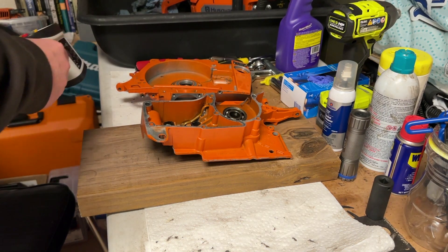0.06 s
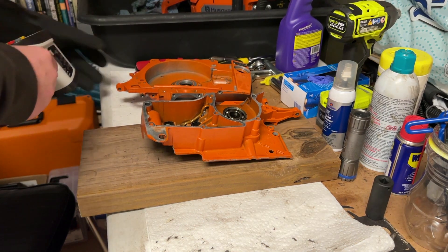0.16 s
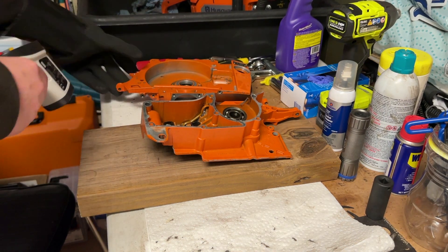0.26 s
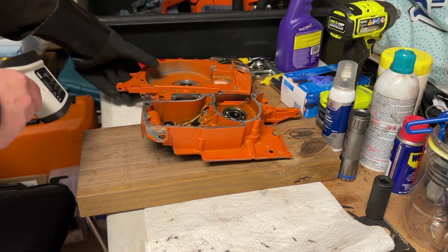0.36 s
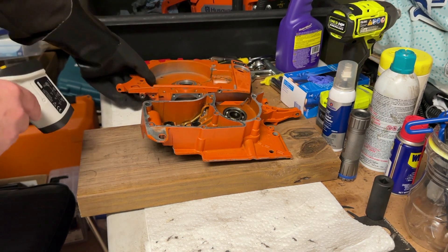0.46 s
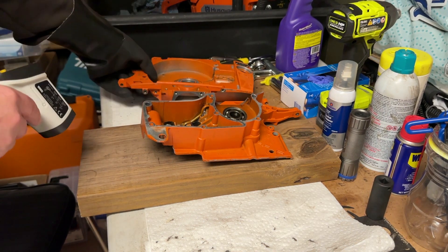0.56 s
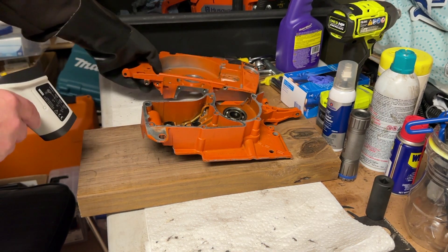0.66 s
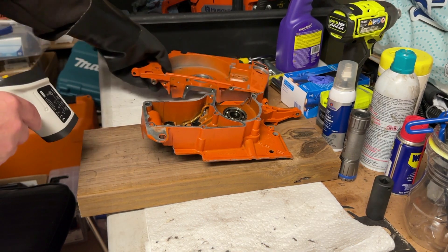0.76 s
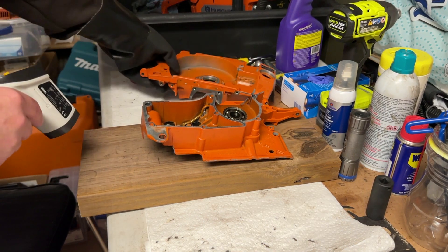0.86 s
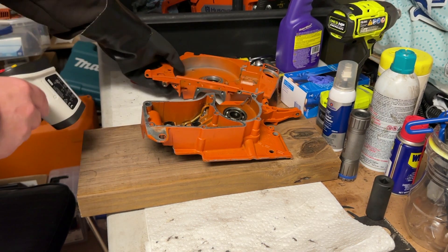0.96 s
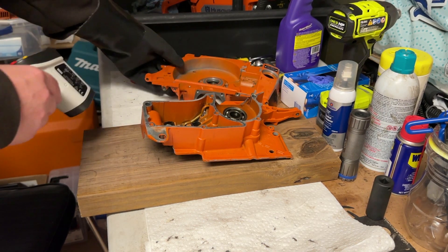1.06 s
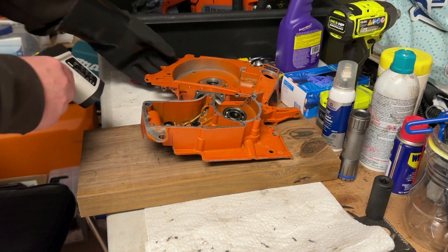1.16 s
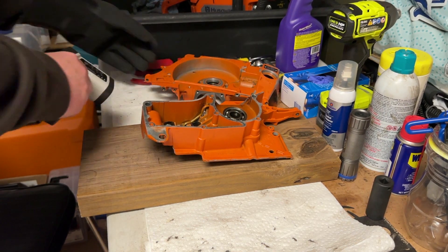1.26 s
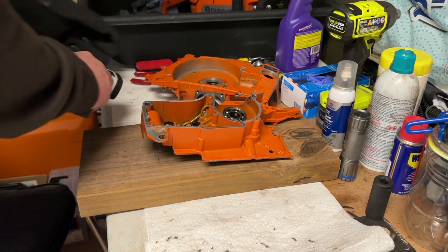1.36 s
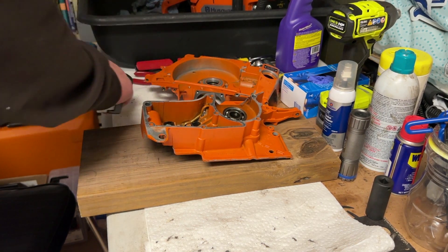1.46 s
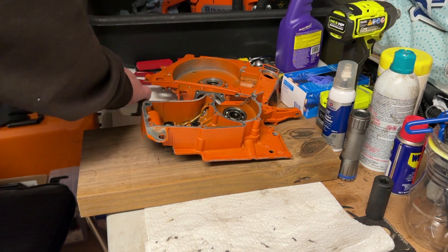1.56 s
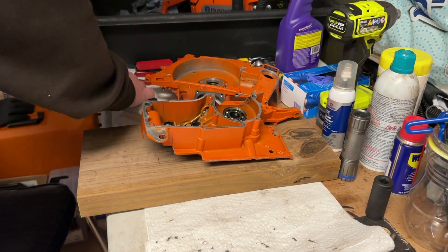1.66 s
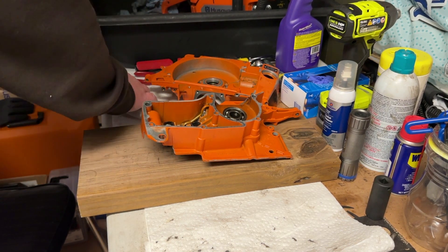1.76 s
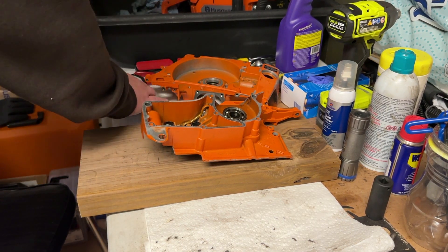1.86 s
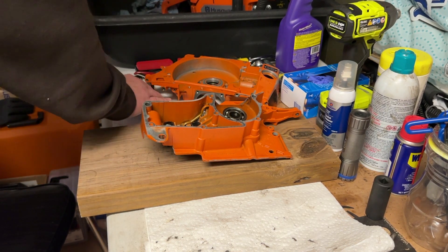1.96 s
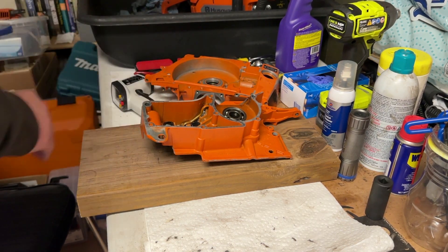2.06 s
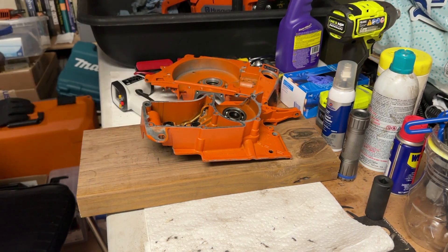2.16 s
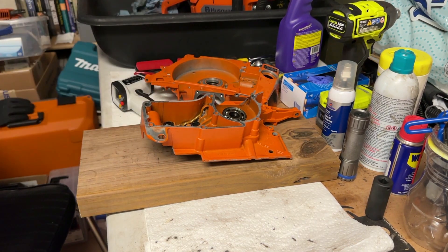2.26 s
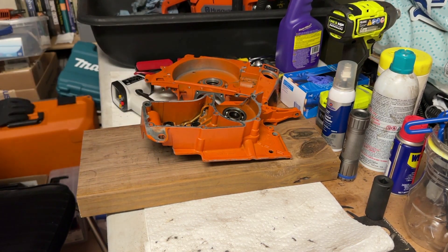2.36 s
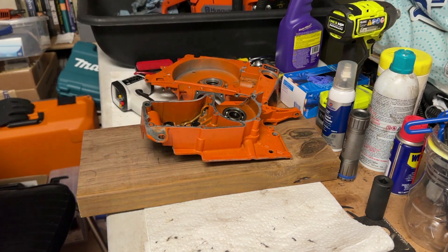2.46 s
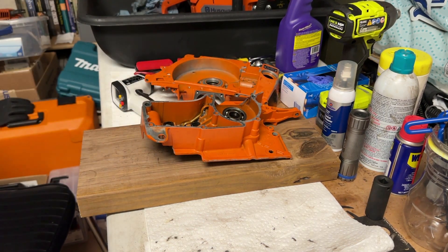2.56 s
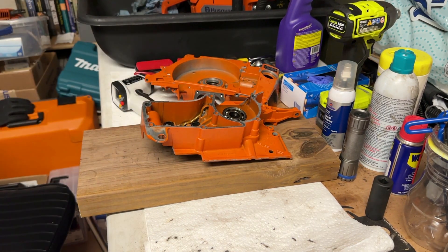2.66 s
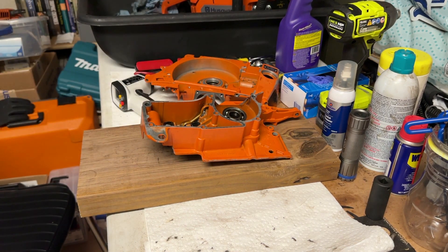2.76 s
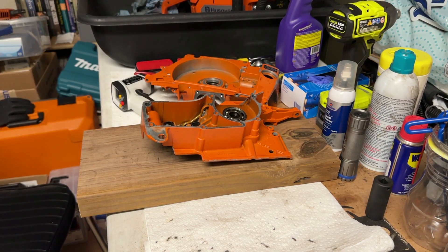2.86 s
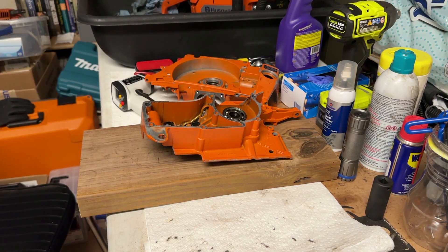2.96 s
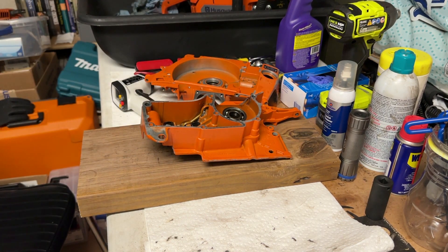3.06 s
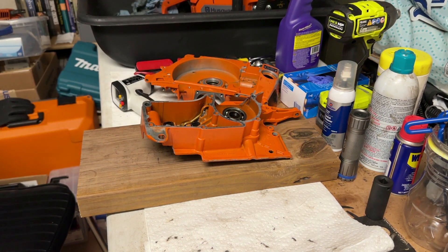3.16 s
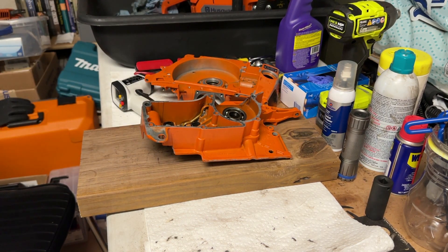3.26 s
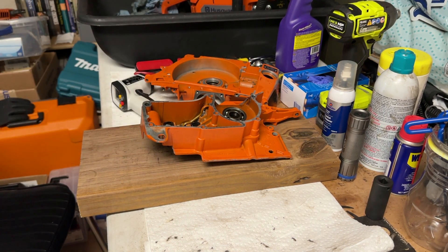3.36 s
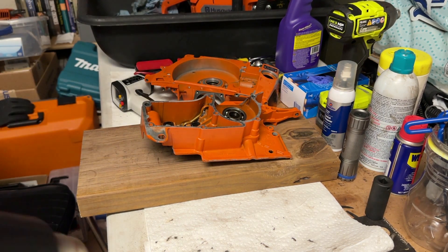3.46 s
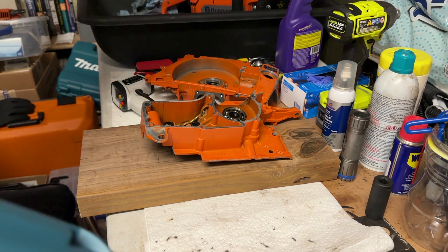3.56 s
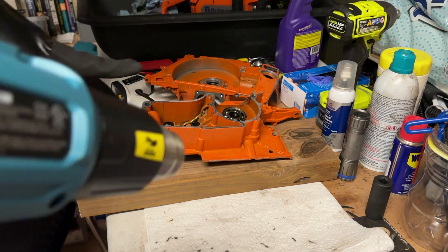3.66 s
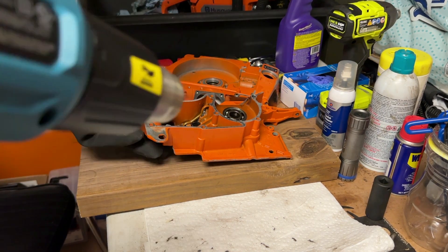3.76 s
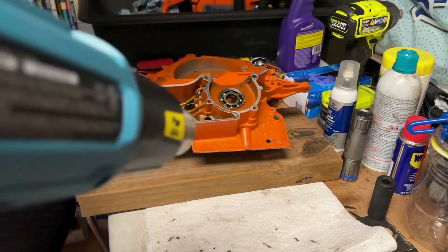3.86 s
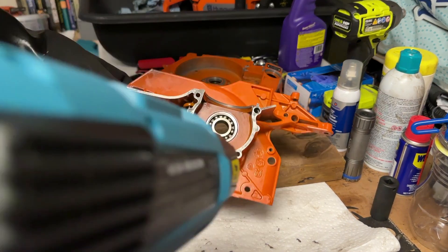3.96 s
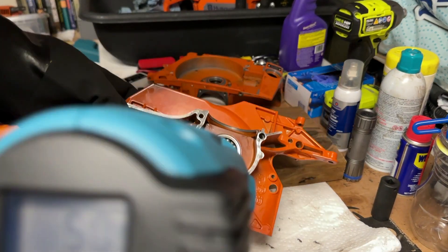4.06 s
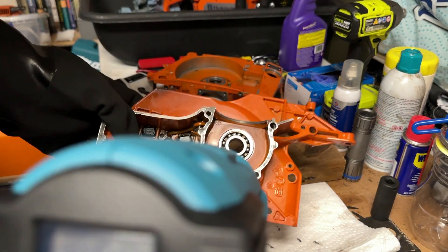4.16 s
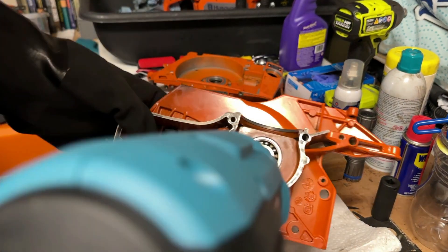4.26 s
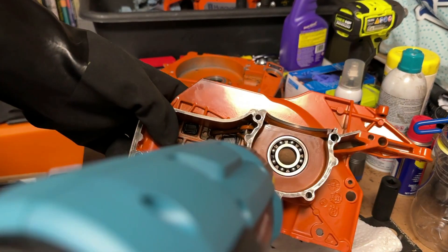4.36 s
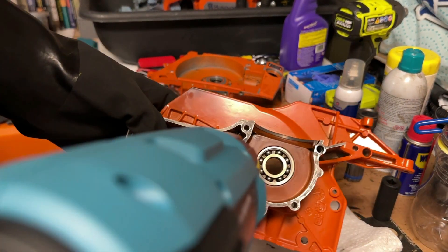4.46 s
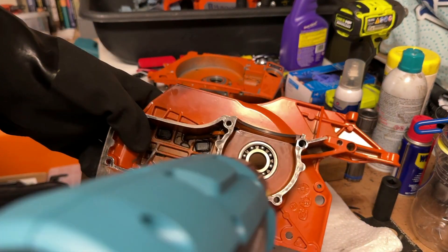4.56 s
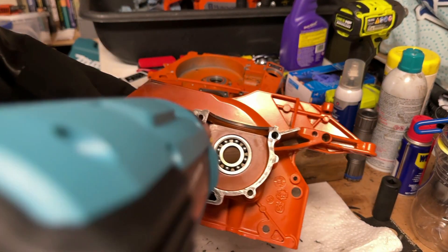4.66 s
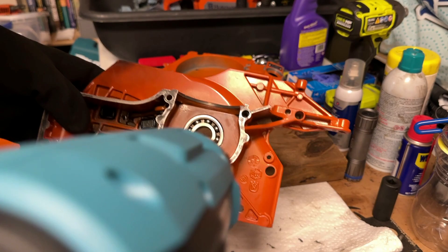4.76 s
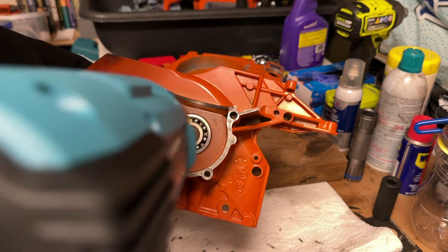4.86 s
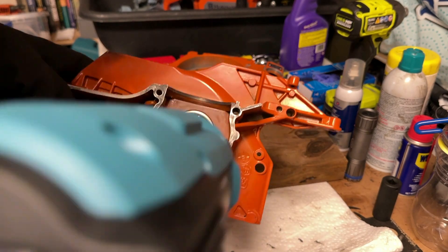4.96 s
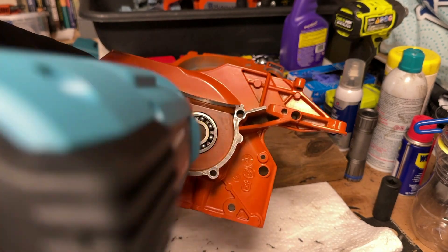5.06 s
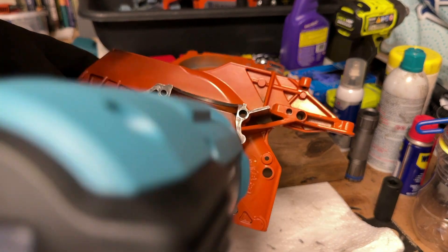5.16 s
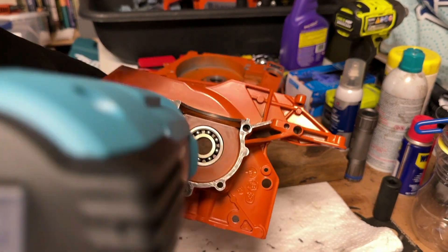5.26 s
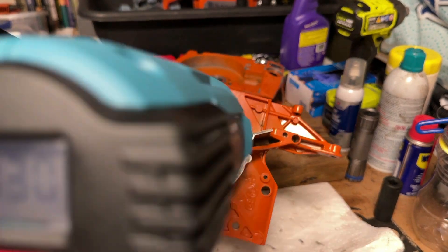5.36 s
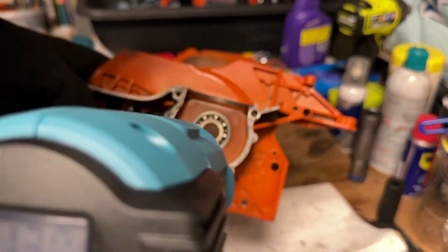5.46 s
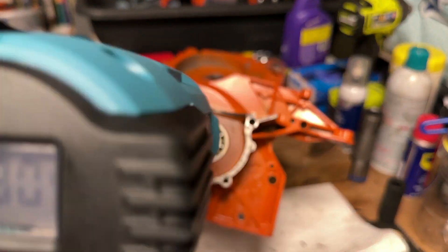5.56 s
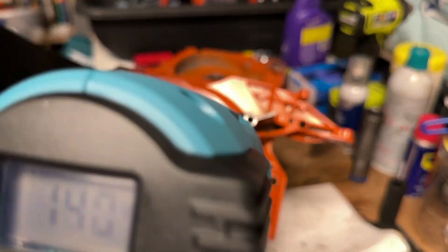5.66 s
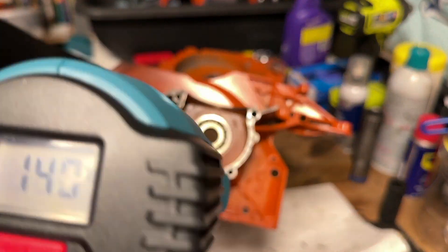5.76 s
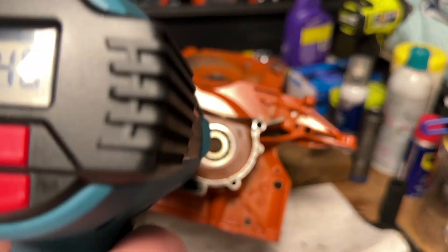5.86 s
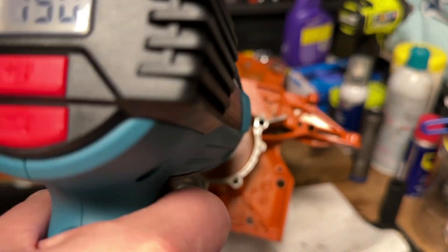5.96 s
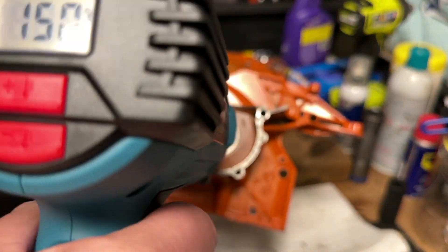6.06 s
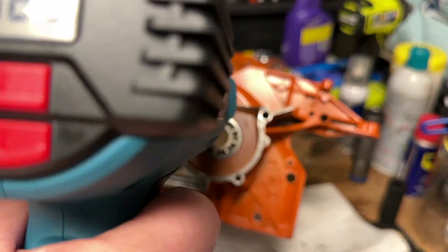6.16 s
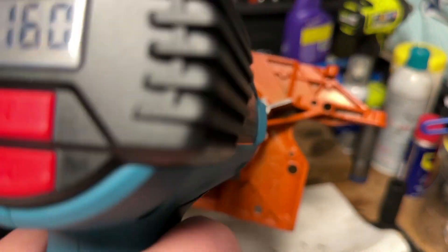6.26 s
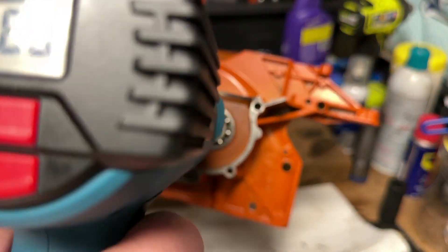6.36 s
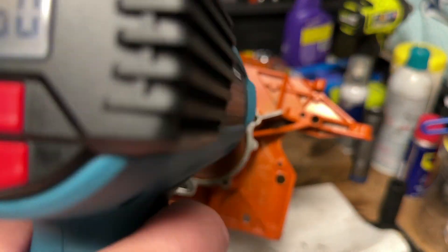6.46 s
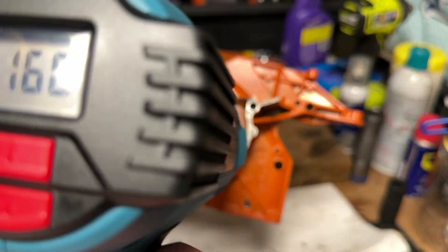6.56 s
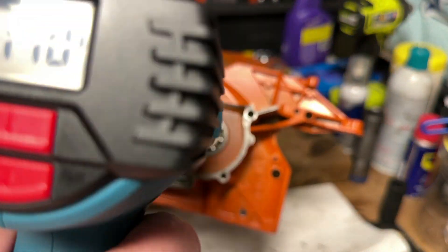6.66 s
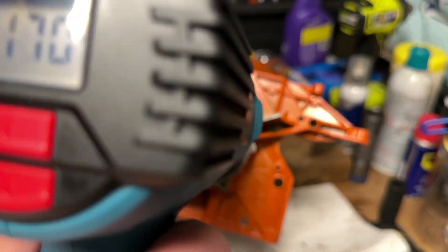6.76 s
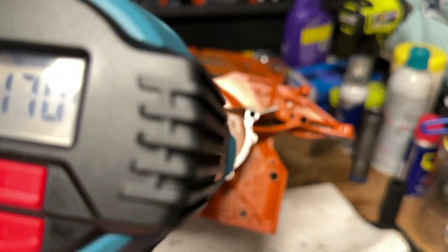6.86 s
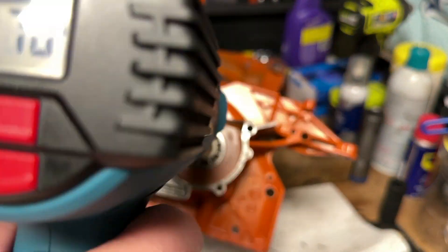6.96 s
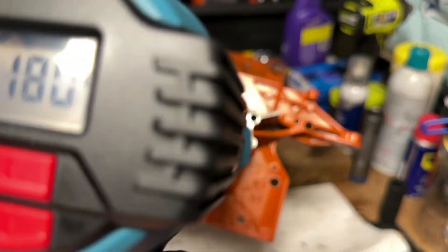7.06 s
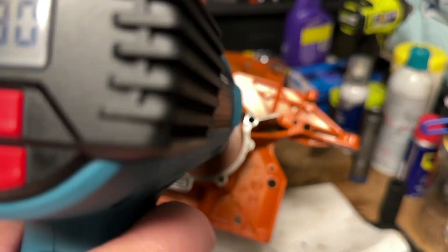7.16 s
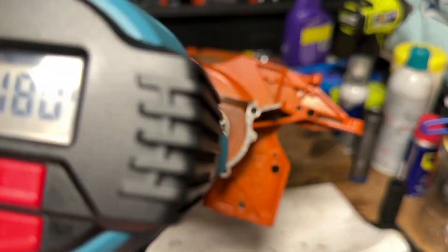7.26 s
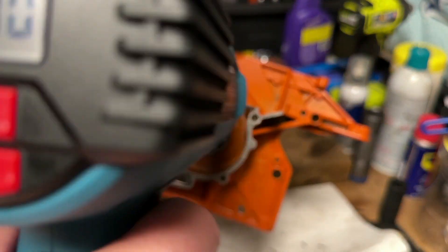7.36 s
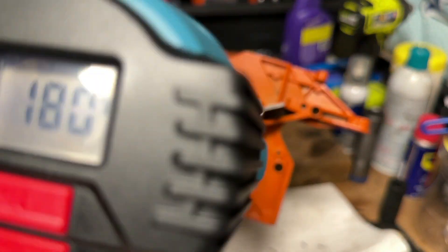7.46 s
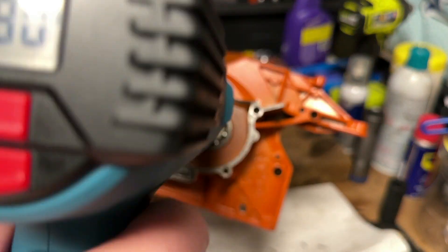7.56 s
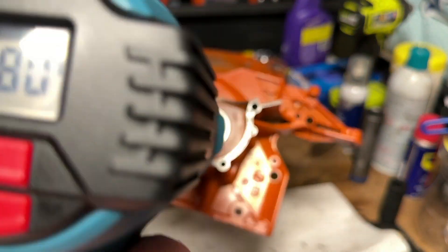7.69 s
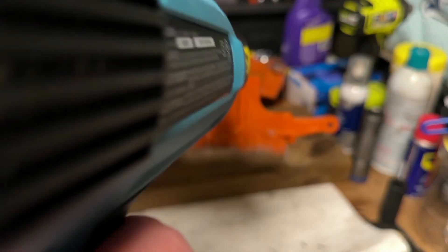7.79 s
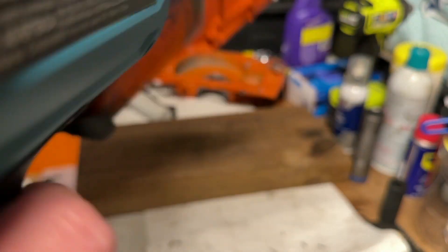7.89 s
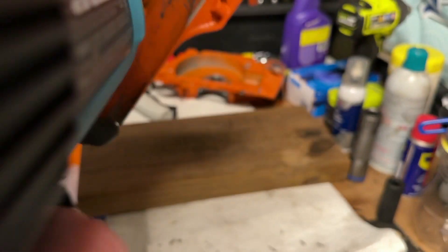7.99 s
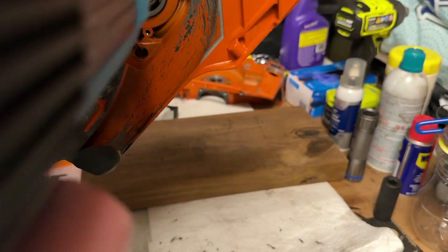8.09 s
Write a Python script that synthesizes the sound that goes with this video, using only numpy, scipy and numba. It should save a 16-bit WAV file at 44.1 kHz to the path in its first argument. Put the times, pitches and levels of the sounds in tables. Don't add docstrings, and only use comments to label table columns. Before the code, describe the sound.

Close stereo microphone in a quiet indoor workshop. First come short scrapes and woody thuds as a cast metal housing is shifted, peaking in a bright, short-ringing crack just before one second. Softer thumps and glove rustle lead to a heat gun starting at about three and a half seconds. Its motor glides up in pitch and settles to a constant fan roar and whine, with low air bumps, growing louder and shriller at the end.

```python
import sys
import numpy as np
from scipy import signal
from scipy.fft import rfft, irfft, next_fast_len
from scipy.io import wavfile
from scipy.ndimage import uniform_filter1d
from numba import njit

SR = 44100
rng = np.random.default_rng(int(sys.argv[2]) if len(sys.argv) > 2 else 0)


def gain_from_decibels(decibels):
    exponent = np.asarray(decibels, float) / 20
    return 10 ** exponent


def dump_mix(stems):
    frames = np.atleast_2d(stems).T
    limited = np.clip(frames, -1, 1)
    pcm = np.round(limited * 32767).astype(np.int16)
    wavfile.write(sys.argv[1], SR, pcm)


N = 358533


def seconds():
    return np.arange(N) / SR


def curves(table):
    s, *columns = np.transpose(table)
    return [np.interp(seconds(), s, c) for c in columns]


def along(points, hz):
    p = np.array(points, float)
    return np.interp(np.log(hz + 1), np.log(p[:, 0] + 1), p[:, 1])


def walk(rate):
    k = int(SR / rate)
    held = np.repeat(rng.standard_normal(N // k + 1), k)
    return 1.32 * uniform_filter1d(uniform_filter1d(held, k), k)[:N]


def hiss(colour, alike, balance, edges, lead=((1, 0), (2, 0))):
    size = next_fast_len(N)
    hz = np.arange(size // 2 + 1) * SR / size
    mid, side = rfft(rng.standard_normal((2, size)))
    likeness = np.clip(along(alike, hz), 0, 1)
    shared, differing = mid * np.sqrt(1 + likeness), side * np.sqrt(1 - likeness)
    leads = (hz < 10500) | (hz > 14100)
    lean = gain_from_decibels(along(balance, hz) / 2) * np.exp(.5j * along(lead, hz) * leads)
    pair = np.array([(shared + sign * differing) * lean ** sign for sign in (1, -1)])
    pair = pair * gain_from_decibels(along(colour, hz)) / (abs(lean) + 1 / abs(lean))
    below = [1 / (1 + (hz / e) ** 12) for e in edges]
    bands = [irfft(pair * np.sqrt(np.abs(hi - lo)), size)[:, :N] for lo, hi in zip(below, below[1:])]
    return [b / np.std(b.mean(axis=0)) for b in bands]


@njit
def svf(x, hz, width):
    y, b, l = np.empty(len(x)), 0., 0.
    for i in range(len(x)):
        g, k = np.tan(np.pi * hz[i] / SR), width / hz[i]
        v = (b + g * (x[i] - l)) / (1 + g * (g + k))
        b, l, y[i] = 2 * v - b, l + 2 * g * v, k * v
    return y


def resonance(x, centre, width):
    centre = np.zeros(N) + centre
    return svf(svf(x, centre, width), centre, width)


def bell(s, width):
    return gain_from_decibels(-5 * (2 * (seconds() - s) / width) ** 2)


# (frequency [Hz], level [dB per Hz])
FLOOR_COLOUR = [(18, -23.5), (30, 0.5), (124, 1), (735, -17.5), (816, -19.5), (1450, -19.5), (2210, -20.5),
                (7200, -29.5), (9860, -25.5), (15800, -29.5)]
# (frequency [Hz], likeness [0-1])
ROOM_LIKENESS = [(60, 0.93), (130, .92), (290, 0.5), (640, 0.5), (3100, 0.01), (10300, 0.3), (10700, 0.6),
                 (13300, 0.95), (14000, .3)]


def room_tone():
    tone, = hiss(FLOOR_COLOUR, ROOM_LIKENESS, [(30, .2), (15000, .3)], (15, 15900))
    return tone * gain_from_decibels(-72 + np.where(seconds() < 2.07, 0, -6) + 1.1 * walk(12))


# (start [s], length [s], scrape [dB], hiss [dB], bench rumble [dB])
DRAGS = [(0.425, 0.03, -62.5, -77, -65), (0.463, 0.052, -61, -71, -56), (0.515, 0.016, -49, -64, -38),
         (0.529, 0.093, -62, -66, -39), (0.82, 0.065, -49, -52.5, -29), (0.911, 0.042, -43, -57, -48),
         (.938, 0.026, -56, -44, -35), (0.974, 0.08, -54, -60, -48), (1.08, 0.075, -60, -69, -35.5),
         (1.177, 0.79, -82, -75.5, -73.5), (1.506, 0.14, -75, -69.5, -74), (1.85, 0.12, -78, -74, -66)]


def contacts():
    sag_db, release_db_per_s = -7.5, -330
    bite_s = np.array([[0.001], [.001], [0.012]])
    t, power = seconds(), 0
    for s, length, *db in DRAGS:
        shape_db = sag_db * np.clip((t - s) / length, 0, 1)
        shape_db = shape_db + release_db_per_s * np.clip(t - s - length, 0, 1)
        bite = np.clip((t - s + bite_s[0]) / bite_s, 0, 1)
        power = power + (bite * gain_from_decibels(shape_db + np.array(db)[:, None])) ** 2
    return np.sqrt(power)


# (frequency [Hz], level [dB per Hz])
GRAIN_COLOUR = [(300, 4.5), (600, 4), (1200, -1), (2200, -4), (3000, -12), (4500, -13), (6500, -11.5),
                (8000, -13.5), (9800, -7), (12000, -26.5), (15800, -17.5)]
# (time [s], width [s], dull
# part [dB], bright part [dB])
CLOTH = [(.15, 0.13, -73.5, -82), (.38, 0.15, -80.5, -80), (.595, 0.068, -60.5, -64),
         (1.89, 0.099, -80, -65.5), (1.955, 0.058, -69, -69), (2.154, 0.049, -71, -67),
         (2.246, 0.031, -70, -61.5), (2.278, 0.061, -68, -73), (2.335, 0.03, -74, -60.5),
         (2.376, 0.05, -64.5, -55.5), (2.449, 0.048, -70.5, -67), (2.526, 0.037, -69, -68.5),
         (2.584, 0.035, -68.5, -71), (2.65, .06, -82, -80), (2.711, 0.027, -70.5, -70),
         (2.818, 0.041, -64.5, -74.5), (2.875, 0.053, -67, -81.5), (2.905, 0.032, -66, -67),
         (3.088, 0.042, -65, -65), (3.15, 0.051, -68, -71.5), (3.19, 0.036, -70.5, -79),
         (3.245, 0.044, -75.5, -72), (3.28, 0.049, -64.5, -69.5), (3.379, 0.022, -69, -55),
         (3.404, 0.016, -56, -38)]
# (time [s],
# width [s], frequency [Hz], bandwidth [Hz], level [dB])
SINGING_RUBS = [(0.15, 0.3, 565, 80, -78), (0.55, .02, 7550, 120, -77), (0.586, 0.038, 840, 200, -60),
                (0.6, .07, 5100, 100, -72), (0.614, 0.027, 3530, 60, -68), (.832, 0.012, 3480, 200, -59),
                (.834, 0.013, 6500, 200, -57), (.845, .025, 480, 200, -52), (0.921, 0.015, 2100, 400, -47),
                (1.125, .08, 450, 200, -63), (1.13, 0.05, 4570, 40, -78), (1.867, .02, 2000, 400, -66),
                (1.94, 0.084, 2000, 540, -72), (2.712, .03, 6800, 300, -73), (2.716, .025, 1900, 980, -70),
                (2.9, 0.037, 1170, 900, -65.5), (3.09, 0.034, 1550, 970, -62.5),
                (3.28, 0.039, 1400, 700, -57), (3.4, 0.027, 8900, 900, -53), (3.405, 0.03, 2530, 2800, -46),
                (3.45, 0.12, 620, 60, -67), (3.5, .04, 1400, 600, -60), (3.53, .04, 12500, 2500, -64),
                (3.66, 0.093, 680, 90, -55)]


def handling():
    dull, bright = hiss(GRAIN_COLOUR, ROOM_LIKENESS, [(300, 2.5), (4000, 3.3), (10000, .1)],
                        (300, 3000, 15900))
    rumble, = hiss([(40, -4.0), (90, 2.0), (160, -4.5), (300, -9)], [(40, 0.97), (300, 0.98)],
                   [(40, .8), (300, 1.2)], (40, 300))
    *gains, bench = contacts()
    for s, width, *db in CLOTH:
        gains = [np.hypot(g, bell(s, width) * gain_from_decibels(d)) for g, d in zip(gains, db)]
    low = gain_from_decibels(-9.5) * bench + 0.54 * gains[0] + gain_from_decibels(-83.0) * (seconds() < 2.75)
    out = dull * gains[0] * gain_from_decibels(2.1 * walk(150))
    out += bright * gains[1] * gain_from_decibels(2.9 * walk(200)) + rumble * low
    for s, width, hz, width_hz, db in SINGING_RUBS:
        x = np.array([resonance(v, hz, 2.5 * width_hz) for v in dull + bright])
        out += x / np.std(x.mean(axis=0)) * bell(s, width) * gain_from_decibels(db)
    return out


# (time [s], peak [dB], frequency [Hz], t60 [s])
BENCH_THUDS = [(.4245, -56, 640, .03), (1.603, -64, 520, .04), (1.725, -61, 806, .06),
               (.5135, -40, 650, .015), (1.934, -56, 700, .03), (1.998, -51, 150, .05),
               (2.025, -56.5, 125, 0.042), (.516, -34, 313, 0.019), (0.526, -35, 90, 0.16),
               (0.827, -30, 214, 0.064), (.845, -32.5, 84, 0.1), (0.935, -29.5, 338, 0.058),
               (1.098, -32, 94, 0.13), (1.599, -63.5, 120, 0.12), (1.851, -50, 113, 0.3),
               (1.87, -52, 70, .3), (1.942, -35.5, 142, 0.086), (2.268, -48.5, 196, 0.021),
               (2.389, -59.5, 132, 0.074), (2.579, -53, 141, 0.05), (3.948, -37, 70, 0.12),
               (4.21, -42, 126, .07), (6.135, -38.5, 35, .12), (6.25, -46, 40, .1), (6.4, -39, 33, 0.1),
               (6.542, -35.5, 39, 0.15), (6.69, -35, 38.3, 0.12), (6.82, -39, 44.7, 0.069),
               (6.965, -32, 45, 0.07), (7.69, -43, 55, .1), (7.841, -47, 45, 0.11)]


def thuds():
    out, t = np.zeros(N + SR), np.arange(SR // 2) / SR
    for s, peak_db, hz, t60 in BENCH_THUDS:
        swing = np.sin(2 * np.pi * hz * t) + 0.41 * np.sin(2 * np.pi * 1.55 * hz * t)
        swing = swing * 1000. ** (-t / t60) * (1 - np.exp(-(t * hz / .45) ** 2))
        out[int(s * SR):int(s * SR) + len(t)] += swing * gain_from_decibels(peak_db) / np.abs(swing).max()
    return out[:N] * gain_from_decibels([[.4], [-.4]])


# (time [s], peak [dB], ring time share [1], softness [ms])
BLOWS = [(.4252, -59, 0.15, 0.15), (.4632, -53, 0.15, .09), (.5135, -40.5, 0.1, 0.078),
         (0.8203, -45.5, 0.5, 0.092), (.9085, -35, 0.99, 0.06), (0.9331, -11, 1.1, 0.011),
         (0.9365, -13.5, 1.17, 0.011), (.948, -25, .9, .011), (1.03, -52, .2, .012), (1.082, -56, 0.27, .2),
         (1.506, -63, 0.5, 0.054), (3.379, -47, 0.098, 0.026), (1.865, -57, 0.3, 0.046),
         (1.725, -66, .2, .15), (1.933, -60, .2, .15)]
# (frequency [Hz], level [dB], t60 [s])
HOUSING_MODES = [(1113, -18, 0.08), (883, -15, 0.05), (2135, -7, 0.058), (2700, -13, 0.098),
                 (3144, -16.5, 0.1), (3560, -12.5, 0.067), (3970, -17, 0.09), (4560, -7, 0.05),
                 (5450, -17.5, 0.083), (6004, -18.5, 0.13), (6516, -13, 0.076), (7210, -17, 0.06),
                 (7640, -16.5, 0.077), (9900, -20.5, 0.029)]


def knocks():
    out, t = np.zeros((2, N + SR)), np.arange(SR // 4) / SR
    hz, db, t60 = np.repeat(np.transpose(HOUSING_MODES), 3, axis=1)[:, :, None]
    hz = hz * (1 + .013 * rng.standard_normal(hz.shape))
    crack_band = signal.butter(4, (1900, 8200), "band", fs=SR, output="sos")
    for s, peak_db, share, soft_ms in BLOWS:
        phase = rng.uniform(0, 2 * np.pi, (len(hz), 1)) + rng.normal(0, 1.0, (2, len(hz), 1))
        size = gain_from_decibels(db - db.max() + 1.7 * rng.standard_normal((len(hz), 1)))
        decay = 1000. ** (-t / (share * np.clip(t60, .02, .11)))
        ring = (size * decay * np.sin(2 * np.pi * hz * t + phase)).sum(axis=1)
        raw = rng.standard_normal((2, len(t)))
        grit = signal.sosfilt(crack_band, raw)
        crack = (grit + raw * .5) * gain_from_decibels(4) * np.exp(-t / .0025)
        tail = grit * gain_from_decibels(-5) * 1000. ** (-t / (0.2 * share))
        push = np.exp(-1000 / SR / max(soft_ms, .01))
        blow = (ring + crack + tail) * np.minimum(t / 0.0001, 1)
        blow = signal.lfilter([1], [1, -2 * push, push ** 2], blow)
        i = int(s * SR)
        out[:, i:i + len(t)] += blow * gain_from_decibels(peak_db) / np.abs(blow.mean(axis=0)).max()
    return out[:, :N]


def edge_landing():
    land_s, peak_db, hz = .936, -3.5, 3400
    out, t = np.zeros(N), np.arange(SR // 4) / SR
    window = np.sin(np.pi * np.minimum(hz * t / 2, 1)) ** 2
    i = int(land_s * SR)
    out[i:i + len(t)] = -np.sin(2 * np.pi * hz * t) * window * gain_from_decibels(peak_db)
    return out


FULL_SPEED = 225
# (frequency [Hz], level [dB per Hz])
RUSH_COLOUR = [(40, -11), (250, -5.5), (430, -5), (590, -0.5), (790, -3), (1000, -4.5), (1330, -12),
               (1470, -10.5), (1700, -14), (2500, -15), (3400, -17.5), (4400, -26.5), (5400, -19.5),
               (7600, -14.5), (8450, -21), (9600, -10.5), (10400, -20.5), (11500, -29), (15800, -24)]
# (frequency [Hz], left minus right [dB])
RUSH_BALANCE = [(60, 2.5), (110, 0), (200, 6.5), (380, 4.5), (700, 10), (1290, 5), (2380, 7), (4400, 3.5),
                (8120, 1.5), (15000, 0.5)]
# (frequency [Hz], likeness at the two ports [0-1])
RUSH_LIKENESS = [(60, 0.99), (290, 0.83), (1410, 1), (3100, 0.67), (6800, 0.16), (10300, 1), (10700, 1),
                 (13600, 0.98), (14200, 0)]
# (frequency [Hz], lead of the left port [rad])
RUSH_LEAD = [(0, -1.5), (1550, 1), (2500, 1), (3880, 1.9), (4310, 0.1), (5080, -1), (5600, 3.5),
             (6030, 0.5), (6720, 1.4), (7670, 1.5), (8350, 2), (10400, 1), (13700, -1.3), (15800, -1.5)]


def fan_rush(shaft, air_db, mid_db, treble_db, top_db):
    bands = hiss(RUSH_COLOUR, RUSH_LIKENESS, RUSH_BALANCE,
                 (40, 450, 1400, 5000, 10500, 15900), RUSH_LEAD)
    swell = .5 * walk(1.06)
    thin_db = 20 * np.log10(shaft / FULL_SPEED)
    band_db = (-10.5 + thin_db, -4.7, mid_db, treble_db - 2.0, top_db + 1.25 * thin_db)
    return sum(b * gain_from_decibels(air_db + db + swell + 0.74 * walk(12)) for b, db in zip(bands, band_db))


def blade_turbulence(shaft, air_db):
    out, grown = 0, np.interp(shaft, (120, 175, 205, 214), (0, .7, 1.1, 1))
    # (frequency [Hz], bandwidth [Hz], level [dB], right port [dB])
    for hz, width, db, right_db in ((1091, 105, -4.5, -15.0), (1017, 142, -4.0, -12.5),
                                    (2121, 186, -12.5, -7)):
        x = resonance(rng.standard_normal(N), hz * (shaft / 222) ** .6, 1.33 * width)
        gain = gain_from_decibels(air_db + 5 + db + 0.15 * walk(15)) * grown
        out = out + x / np.std(x) * gain * gain_from_decibels([[0], [right_db]])
    return out


# (start [s], frequency [Hz], bandwidth [Hz], level [dB])
GRILLE = [
    (5.85, 14300, 1000, -59),
    (3.95, 8100, 500, -64),
    (5.85, 11500, 1500, -62),
    (7.84, 2950, 900, -44.5),
    (7.86, 5510, 500, -56),
    (7.88, 8200, 900, -44),
    (7.88, 11980, 1500, -51),
]


def intake_grille():
    out = 0
    for s, hz, width, db in GRILLE:
        x = resonance(rng.standard_normal(N), hz, 1.34 * width)
        out = out + x / np.std(x) * gain_from_decibels(db) * np.clip((seconds() - s) / .12, 0, 1)
    return out


def fan(shaft, air_db, *tilt_db):
    air = fan_rush(shaft, air_db, *tilt_db) + blade_turbulence(shaft, air_db) + intake_grille()
    return air * np.clip((seconds() - 3.43) / 0.048, 0, 1)


STRONG_GRIP_S = (4.2, 4.4, 4.66, 4.77, 5.5, 5.62, 5.85, 6.0, 7.84, 7.99)
# (multiple [1], rising [dB], lifted [dB], held high [dB],
# wrist turning [dB], held level [dB], swung close [dB])
STRONG_LINES = [
    (1, -53, -54.5, -53, -55, -48.5, -36),
    (30, -45, -47, -47, -46.5, -53, -38),
    (40, -70, -52, -42, -48.5, -48, -27.5),
    (45, -52, -42.5, -45, -58, -50, -43),
]


def strong_lines(turn):
    t, out = seconds(), 0
    for (k, rising, lifted, high, turning, level, close), lag in zip(STRONG_LINES, (.2, 1.2, 1.8, 1.0)):
        passing = close - 3.5
        grips = [rising, lifted, lifted, high, high, turning, turning, level, level, close, passing]
        db = np.interp(t, (*STRONG_GRIP_S, t[-1]), grips)
        rise_s = (3.42, 3.75) if k < 2 else (4.02, 4.1)
        db = db + np.interp(t, rise_s, (-34, 0)) + 0.25 * walk(5.4) + 1.4 * walk(25)
        line = np.sin(round(k) * turn + np.array([[lag], [-lag]]) / 2)
        out = out + np.sqrt(2) * gain_from_decibels(db) / np.cos(lag / 2) * line
    return out


# (frequency [Hz], bandwidth [Hz], level [dB])
CASING_MODES = [(6350, 650, 0), (9650, 1000, 5)]


def starting_whine(shaft, turn, air_db):
    current = np.interp(seconds(), (3.53, 3.62, 3.73, 3.79, 3.85, 3.93, 4.03, 4.12),
                        (0, .8, .7, .8, .8, 1.2, 1, 0))
    roughness = .15 + np.clip((176 - shaft) / 35, 0, 1) * 2.2
    out = 0
    for k in range(25, 105, 5):
        lift = sum(gain_from_decibels(db) / (1 + (2 * (k * shaft - hz) / width) ** 4) for hz, width, db in CASING_MODES)
        gain = gain_from_decibels(air_db - 9.5 * (k % 2) + 2.5 * walk(30))
        phase = k * turn + roughness * walk(300) + np.array([[.7], [-.7]])
        out = out + current * lift * gain * np.sin(phase)
    return out


def blade_line(turn):
    swell = np.interp(seconds(), (3.78, 3.88, 4.14, 4.4), (0, .45, 1, 0))
    tone = swell * gain_from_decibels(-38 + 3.0 * walk(20)) * np.sin(5 * turn + 1.2 * walk(40))
    return tone * gain_from_decibels([[3], [-8]])


# (multiple [1], held high [dB], held level [dB], swung close [dB],
# left minus right [dB])
WEAK_LINES = [(4, -52.5, -48, -48, 9), (5, -47.5, -48, -46, 11), (7, -56.5, -52, -65, -9),
              (8, -64.5, -52.5, -49.5, 12), (15, -58, -53.5, -45, 22), (16, -60, -57, -54, 18),
              (20, -65, -74, -68, -5), (24, -54, -57, -47, -3), (25, -58.5, -62, -47.5, 0),
              (29, -56, -55.5, -55, -9), (35, -62, -57.5, -55, 3), (39, -63, -63, -61, 4),
              (41, -55, -68, -42, 1.5), (44, -60, -59, -58, 0), (46, -60, -62, -52, 0),
              (47, -67, -69, -58, 0), (50, -66, -60.5, -47, 0), (55, -74, -70, -59, 0),
              (60, -61, -71, -60, 0), (64, -73, -67, -59, 0), (65, -71, -56, -54, -0.5),
              (66, -65, -61, -56, 0), (69, -66, -69, -59.5, 0), (70, -60, -62, -71, 0),
              (71, -58, -76, -80, 0)]
# (frequency [Hz], lead of the left port [rad])
PORT_LEAD = [(900, .3), (5300, 1.3), (6600, 1.1), (7800, 2.2), (9000, 1.6), (10300, .7), (10600, 0),
             (14000, 0), (14300, -1.4), (15700, -2.1)]


def weak_lines(turn):
    grip_s = (4.0, 4.45, 5.45, 5.9, 7.85, 7.97)
    shadowed = (39, 41, 60, 66, 69)
    t, out = seconds(), 0
    wrist_db = -14 * np.exp(-((t - 5.66) / 0.2) ** 2)
    for k, high, level, close, pan_db in WEAK_LINES:
        start, lag = rng.uniform(0, 2 * np.pi), along(PORT_LEAD, k * FULL_SPEED)
        ports = gain_from_decibels([[pan_db / 2], [-pan_db / 2]])
        ports = ports / abs(ports[0] * np.exp(1j * lag) + ports[1]) * 2
        db = np.interp(t, grip_s, [high - .4 * max(k - 24, 0), high, high, level, level, close])
        db = db + np.interp(t, (3.9, 4.09), (-30, 0))
        db = db + (round(k) in shadowed) * np.interp(t, STRONG_GRIP_S[2:4], (-10, 0))
        db = db + (k > 58) * wrist_db + 0.74 * walk(1.98) + 1.26 * walk(18)
        line = np.sin(round(k) * turn + start + np.array([[lag], [0]]))
        out = out + np.sqrt(2) * gain_from_decibels(db) * ports * line
    return out


def motor(shaft, air_db):
    turn = 2 * np.pi * np.cumsum(shaft) / SR
    lines = strong_lines(turn) + starting_whine(shaft, turn, air_db) + blade_line(turn) + weak_lines(turn)
    return lines * np.clip((seconds() - 3.47) / 0.073, 0, 1)


# (time [s], shaft speed [Hz], nearness [dB], intake facing the microphone [0-1])
HAND_HELD_GUN = [(3.46, 66, -2.5, 0.63), (3.65, 125.4, -1, 0.84), (3.8, 167.8, -2.5, 0.82),
                 (3.9, 186.5, -2.5, 0.75), (4.05, 201.3, -0.5, 0.9), (4.2, 208.3, -0.5, 0),
                 (4.4, 214.1, 0.5, 0.26), (4.7, 216.8, 0.5, 0.33), (5.1, 219, 0.5, 0.24),
                 (5.7, 220.4, 0, 0.13), (6.7, 222.4, 0.5, 0.13), (7.83, 223, 1, 0.05),
                 (8.02, 223.2, 2.5, 0.56), (8.13, 223.3, 1.5, 0.65)]


def scene():
    shaft, near_db, facing = curves(HAND_HELD_GUN)
    shaft = uniform_filter1d(shaft, SR // 10)
    air_db = -36 + near_db + 2.09 * 20 * np.log10(shaft / FULL_SPEED)
    # (intake turned away [dB], gained when facing [dB])
    tilts = ((-5, 1.5), (-13, 10.5), (-14.5, 8))
    tilt_db = [away + gain * facing for away, gain in tilts]
    bench = room_tone() + handling() + thuds() + knocks() + edge_landing()
    return bench + fan(shaft, air_db, *tilt_db) + motor(shaft, air_db)


def band_limit(x):
    return signal.sosfilt(signal.butter(12, 16250, fs=SR, output="sos"), x)


def record(dry):
    fade = np.interp(seconds(), (2.048, 2.053, 2.082, 2.12), [1, 0, 0, 1]) ** 2
    top_cut = signal.ellip(12, .2, 60, 15690, fs=SR, output="sos")
    mix = signal.sosfilt(top_cut, dry * (fade + 1e-4))
    return band_limit(mix)


dry = scene()
out = record(dry)
dump_mix(out)
```